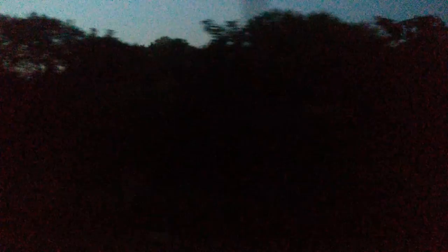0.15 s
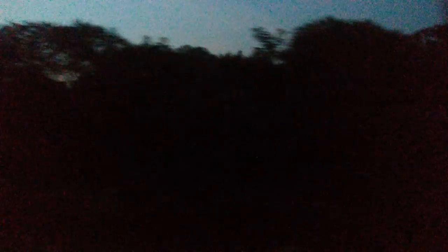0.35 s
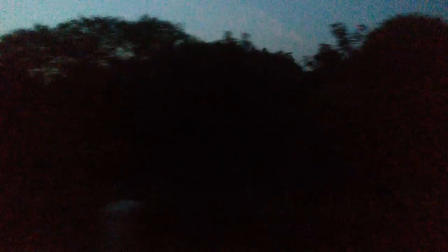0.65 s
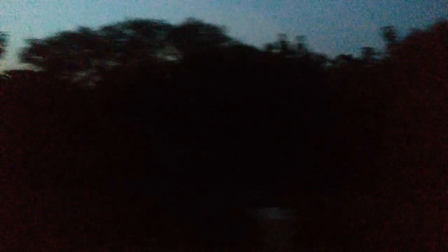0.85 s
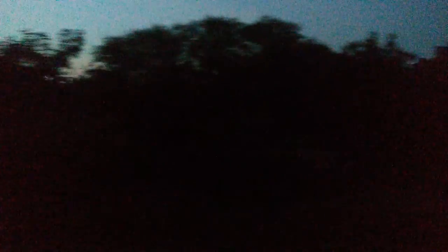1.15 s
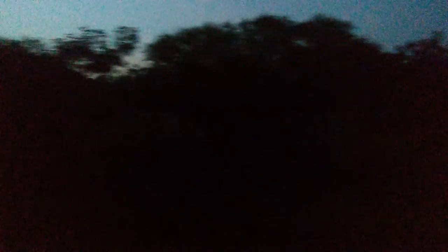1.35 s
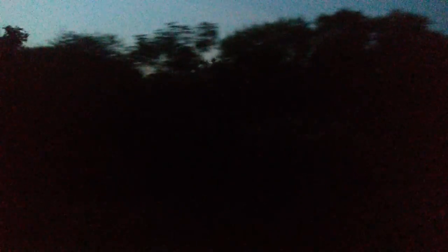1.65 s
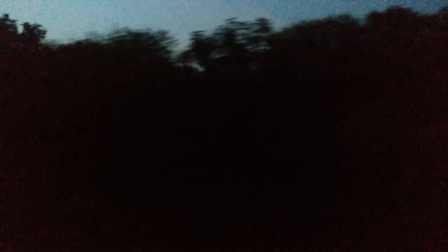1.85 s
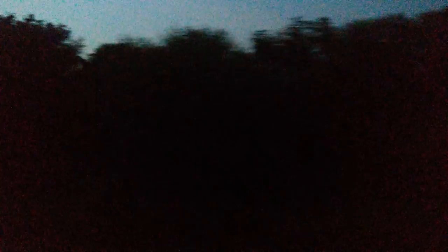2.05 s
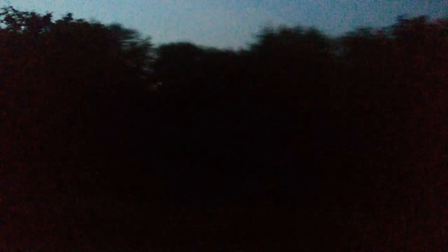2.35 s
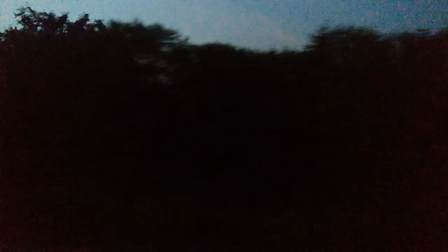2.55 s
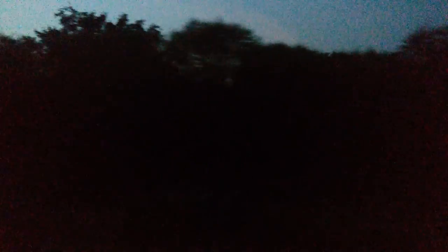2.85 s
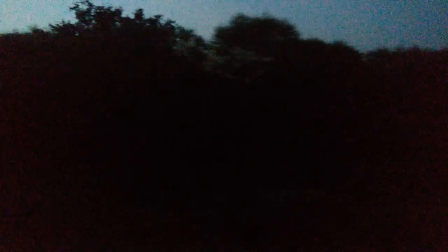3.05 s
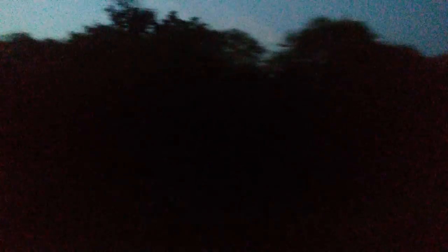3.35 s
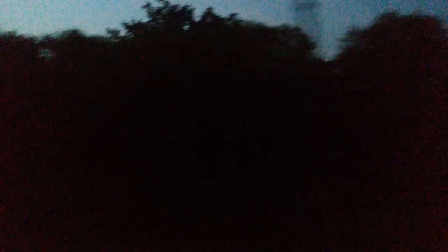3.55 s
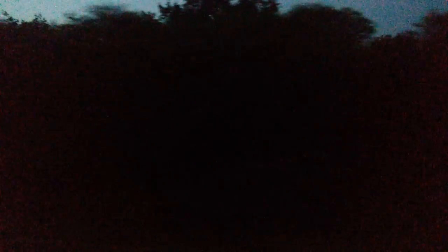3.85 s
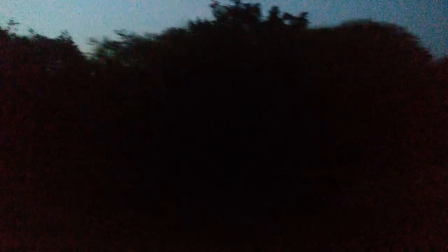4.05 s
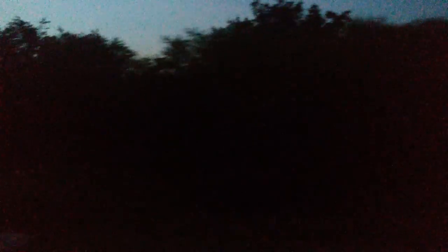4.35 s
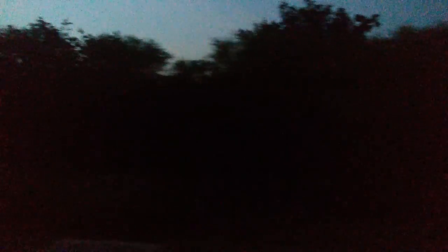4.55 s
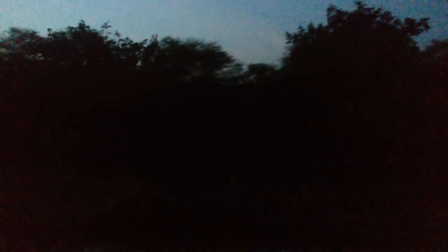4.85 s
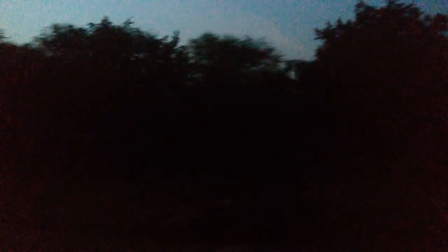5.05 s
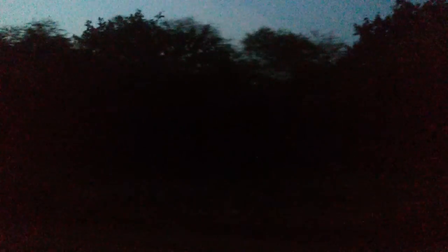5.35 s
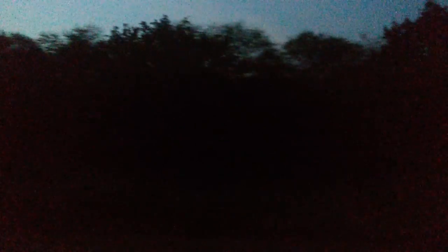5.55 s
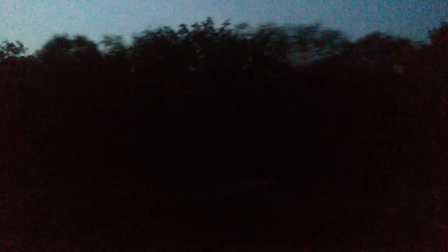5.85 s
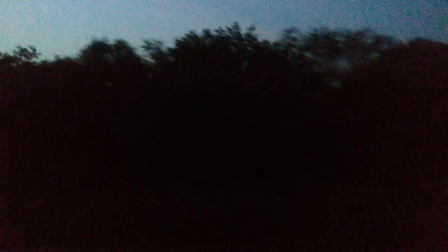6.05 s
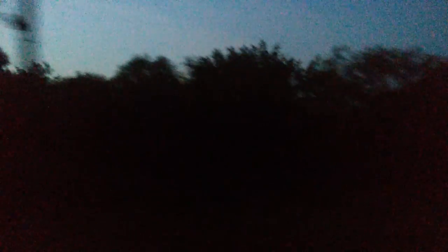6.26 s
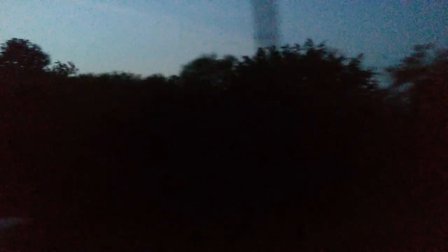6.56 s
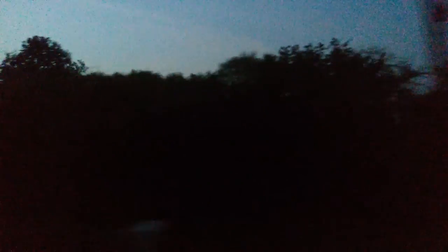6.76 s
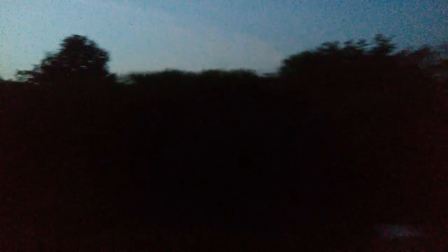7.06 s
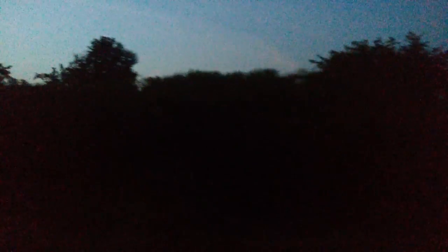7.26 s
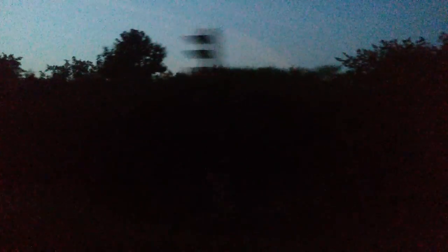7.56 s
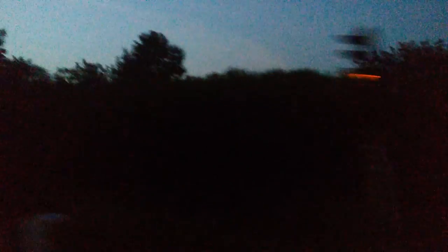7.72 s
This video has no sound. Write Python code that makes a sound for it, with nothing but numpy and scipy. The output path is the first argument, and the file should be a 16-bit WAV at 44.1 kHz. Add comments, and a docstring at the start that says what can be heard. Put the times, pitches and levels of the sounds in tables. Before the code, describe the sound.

A train rolls fast on rough rail, heard from inside the carriage for about eight seconds. A loud low boom and a hollow panel drone run throughout, surging unevenly, with a steady roar and hiss from the wheels and a faint, high rail whine. One wheel knocks lightly about six times a second. Harder jolts with metal clatter and rattle come irregularly, notably around 1, 1.8 to 2, 3.2, 4 and 5.5 seconds. Short hollow knocks sound in the wall near 0.6, 1.5, 1.8, 4.5 and 6.2 seconds. A small metal part pings once, softly, at about 2.6 seconds. Faint, brief wheel squeals come near 0.8, 3 to 3.5 and 5.5 seconds. From about 7.4 seconds to the end there is a cluster of sharper clacks and rattles. The running noise never lets up, and the loudest peaks crackle slightly.

```python
"""Train wheels rolling fast on rough rail, heard from inside the carriage.
They shake the floor into a boom and the panels into a drone, and roar and hiss outside the window.
A flat spot on one wheel knocks once a turn, the running gear jolts, and the wall gives hollow knocks.
The rail sings, wheels squeal briefly and a small metal part pings once.
The loudest peaks are rounded off and clipped, with a slight crackle."""
import sys
import numpy as np
from scipy import signal
from scipy.fft import rfft, irfft, next_fast_len
from scipy.io import wavfile
from scipy.ndimage import uniform_filter1d, map_coordinates

SR = 44100
rng = np.random.default_rng(int(sys.argv[2]) if len(sys.argv) > 2 else 0)


def file_out(sig):
    """Save sig as 16-bit WAV at sys.argv[1]."""
    # one column per channel
    cols = np.atleast_2d(sig).T
    # limit, then scale
    lim = np.clip(cols, -1, 1)
    pcm = np.round(lim * 32767).astype(np.int16)
    wavfile.write(sys.argv[1], SR, pcm)


N = 347949

# Loudness of the carriage body: time_s, boom_db, drone_db
BODY_LEVELS = [(0, -13, -13.5), (.35, -17, -15), (.7, -11, -17.5), (.95, -18.5, -15.5), (1.15, -11.5, -16),
               (1.47, -15.5, -12), (1.7, -12.5, -18), (2, -15, -14), (2.4, -15, -16.5), (2.75, -17.5, -16),
               (2.9, -15.5, -12.5), (3.2, -17, -19), (3.3, -17, -15.5), (3.6, -13.5, -14.5),
               (3.75, -16.5, -15), (4, -17, -14), (4.25, -13, -17.5), (4.42, -12.5, -16.5),
               (4.75, -16.5, -17), (5, -16, -17), (5.3, -16, -18.5), (5.52, -15.5, -18),
               (5.85, -14.5, -20.5), (6.1, -15, -18.5), (6.4, -15, -18.5), (6.7, -12.5, -19), (7, -16, -16),
               (7.12, -16, -15), (7.35, -14.5, -22.5), (7.55, -14.5, -16.5), (7.7, -17, -15),
               (7.89, -12.5, -19)]
# Brief swells and dips in the boom and the drone: middle_s, boom_change_db, drone_change_db
BODY_SWELLS = [(0.571, 2.5, 7), (.82, 1.5, -1), (1.01, -3, 7), (1.36, -2, 3.5), (1.84, -12, 6.5),
               (2.05, 5, -1), (2.61, -1, 6), (3.33, -3.5, 3.5), (4.3, -0.5, 1.5), (4.481, -1.5, 4),
               (4.6, 1.5, 3), (4.77, 1.5, 4), (4.97, 3, -6.5), (5.19, 2, 2), (5.451, 1, 3.5),
               (5.76, 6.5, 2.5), (6.19, -2.5, 2.5), (6.27, 5.5, 0), (6.58, 5, 8), (6.921, 4.5, 4.5),
               (7.16, 7.5, -2), (7.555, 4, -3.5)]
# Tone colour of each rolling noise: pitch_hz, level_db
FLOOR_COLOUR = [(90, -52), (120, -11), (140, -2), (165, 2), (190, 1.5), (230, -2.5), (274, -2), (345, -8),
                (420, -70.5)]
PANEL_COLOUR = [(210, -5), (350, -11.5), (366, 2), (383, 6), (430, 1), (470, 4), (518, -4.5), (567, -0.5),
                (720, -13.5), (940, -22), (1580, -120)]
ROAR_COLOUR = [(400, -18), (680, -1.5), (751, -5.5), (1030, -6.5), (1260, -11.5), (1550, -19.5),
               (2020, -60), (3410, -120)]
HISS_COLOUR = [(850, -28), (1450, -5), (1730, -1.5), (1900, 1.5), (2160, -0.5), (2840, -2.5), (3500, 1),
               (3950, 2.5), (4500, -1), (6070, -7.5), (7120, -14), (8350, -18), (9050, -23), (9600, -33),
               (10000, -100)]
RUMBLE_COLOUR = [(15, -42.5), (25, -36.5), (42, -37.5), (55, -15.5), (72, -16), (97, -6), (115, -6),
                 (150, -26.5), (250, -120)]
# Notes at which each part likes to ring: pitch_hz, width_hz, level_db
FLOOR_NOTES = [(166.7, 20, -9), (272.2, 11.5, -16)]
PANEL_NOTES = [(383.7, 21, -7), (442.6, 47, -11.5)]
SMALL_PANEL_NOTES = [(555, 30, -17), (681, 40, -19)]
WHEEL_RAIL_NOTES = [(2454, 10, -19.5), (4060, 230, -14.5)]
# How freely the floor and the panels ring: time_s, gain_db
FLOOR_RINGING = [(0, -6), (.35, -11), (.8, 6.5), (1.4, -2.5), (2, 2.5), (2.6, -1), (3.6, 4), (4.6, -5.5),
                 (4.85, 9), (5.1, 7.5), (5.5, 5), (5.9, 7), (6.4, -1), (6.9, -3), (7.89, -2.5)]
PANEL_RINGING = [(0, -1), (1.5, -1), (3, -2.5), (3.4, 3.5), (4, 3), (4.7, 0), (5.1, -4.5), (6, 4.5),
                 (6.25, 4.5), (6.6, -4.5), (7.1, 2.5), (7.89, -3)]
# Loudness of the other rolling noises: time_s, rumble_db, roar_db, hiss_db
ROLLING_LEVELS = [(0, -29, -21, -21.5), (.6, -32.5, -21, -20.5), (1.6, -33.5, -21, -22),
                  (2.3, -32, -22.5, -21.5), (2.75, -32, -23.5, -22), (2.95, -32, -24, -21),
                  (3.2, -30, -21, -21), (3.8, -32, -22.5, -22), (5.2, -26.5, -22.5, -21),
                  (5.7, -31.5, -25, -20.5), (6.4, -30.5, -21, -20), (7, -30, -22, -21),
                  (7.1, -36.5, -22, -21.5), (7.3, -30, -19.5, -18), (7.6, -31.5, -22.5, -21.5),
                  (7.89, -33, -24, -22)]

# Harder blows in the running gear: start_s, knock_db, clatter_db, rattle_db, tick_db
JOLTS = [(.2, -25, -34, -29, -36), (.55, -19.5, -27.5, -32.5, -41), (.817, -20.5, -28.5, -26.5, -30),
         (1.023, -17, -24.5, -27, -33), (1.181, -17.5, -31.5, -25, -32), (1.813, -33.5, -22, -18, -29),
         (1.84, -33.5, -23, -21, -34.5), (1.986, -30, -22.5, -23, -33.5), (2.015, -26, -30, -25.5, -30.5),
         (2.312, -22, -28, -30, -31), (2.576, -37, -37, -32, -26.5), (2.641, -18.5, -36, -33, -39),
         (2.948, -16.5, -30, -27, -34.5), (3.06, -19, -38, -39, -51), (3.231, -24, -22.5, -20.5, -23.5),
         (3.259, -14.5, -20, -22.5, -36.5), (3.43, -26, -25, -34, -44), (3.894, -22, -32, -29, -26),
         (4.053, -17, -24, -28.5, -28.5), (4.25, -25.5, -23, -28, -27), (4.366, -22.5, -26, -27, -31),
         (4.69, -23.5, -23.5, -26.5, -33), (4.997, -20.5, -25.5, -32, -44), (5.044, -28, -26, -23, -34.5),
         (5.158, -21.5, -31, -23, -27.5), (5.459, -18.5, -24, -21, -32.5), (5.534, -24, -25, -26, -29),
         (5.618, -17.5, -23.5, -28, -27.5), (5.775, -20, -38, -38, -45), (5.94, -17.5, -36, -32, -43),
         (6.258, -37, -31, -26.5, -25.5), (6.31, -37, -35, -30, -31.5), (6.557, -22, -24, -24, -34),
         (6.871, -20.5, -23.5, -25.5, -30.5), (6.962, -26, -26, -20.5, -23), (7.027, -20.5, -26, -35, -40),
         (7.375, -18, -21, -18, -25), (7.493, -16, -21.5, -20.5, -24.5), (7.635, -27.5, -17.5, -15.5, -22),
         (7.718, -25, -23.5, -20, -23.5), (7.798, -32, -18, -15, -24)]
# Tone colour of each part of a blow: pitch_hz, level_db
KNOCK_COLOUR = [(300, -51), (550, 3.5), (800, -4), (1200, -8), (1600, -20), (2500, -43)]
CLATTER_COLOUR = [(900, -50), (1400, -8.5), (2060, -4.5), (2800, -9), (3500, -8), (4500, -57)]
RATTLE_COLOUR = [(2300, -45), (3100, -9), (3900, -0.5), (4600, -2), (5400, -11.5), (6300, -33.5)]
TICK_COLOUR = [(3800, -28.5), (4800, -2.5), (6000, 0.5), (7000, -10), (8700, -11), (9400, -20),
               (10000, -100)]
# Notes of the frame that holds the wheels: pitch_hz, level_db, fade_s (time to fall 60 dB)
FRAME_NOTES = [(676, 1, 0.092), (820, -2, 0.096), (910, -1, 0.16), (1042, -2, .1), (1490, -11, .07),
               (1880, -12.5, .07)]
# Hollow knocks in the wall: start_s, pitch_hz, level_db
WALL_KNOCKS = [(.555, 417, -4), (1.512, 406, -6.5), (1.835, 396, -5.5), (3.262, 955, -15), (3.32, 385, -8),
               (4.052, 690, -8.5), (4.468, 411, -4), (5.454, 450, -9), (5.94, 917, -14), (6.18, 415, -2.5),
               (6.262, 401, -4), (7.495, 875, -11.5), (7.503, 440, -10.5)]
# Squeals of wheel on rail: middle_s, length_s, pitch_hz, width_hz, level_db
SQUEALS = [(0.822, 0.09, 1915, 90, -29.5), (3.05, 0.3, 2453, 30, -34), (3.47, 0.19, 2465, 22, -32),
           (5.47, 0.08, 4170, 90, -21), (5.631, 0.1, 4090, 120, -22)]
# The strike on the small metal part: start_s, level_db
PING_STRIKES = [(2.576, -22.5)]
# Notes of that part: pitch_hz, level_db, fade_s
PING_NOTES = [(4200, -1, 0.088), (5130, 0.5, .09), (6000, 2, 0.17), (7040, -5.5, 0.088)]
# Loudness of the singing rail: time_s, level_db
WHINE_LEVELS = [(0, -42), (.7, -35), (1.05, -34.5), (1.3, -44.5), (2, -32.5), (2.5, -34.5), (2.9, -31),
                (3.3, -36), (3.6, -42.5), (4.3, -34), (4.7, -50), (5.3, -37.5), (5.65, -32), (6.1, -34),
                (6.7, -42.5), (7.1, -41), (7.89, -39)]


def carriage_body():
    """Rough rail shakes the floor into a boom and the panels into a drone; both surge at random."""
    boom_db, drone_db = curves(BODY_LEVELS) + body_swells()
    boom = steady(noise(FLOOR_COLOUR, patchy_db=0.5))
    boom += amp(*curves(FLOOR_RINGING)) * ringing(FLOOR_NOTES, waver_db=1.4)
    drone = steady(noise(PANEL_COLOUR, patchy_db=0.5))
    drone += amp(*curves(PANEL_RINGING)) * ringing(PANEL_NOTES, waver_db=1.8)
    drone += ringing(SMALL_PANEL_NOTES, waver_db=1.5)
    return amp(boom_db + 0.83 * wobble(9)) * boom + amp(drone_db + wobble(9)) * drone


def body_swells(length_s=0.056):
    """Brief swells and dips in the boom and the drone: two curves in dB."""
    t = np.arange(N) / SR
    return sum(np.outer(change_db, swell(t - s, length_s)) for s, *change_db in BODY_SWELLS)


def wheels_on_rail():
    """Rolling makes a deep rumble, plus a roar and a hiss that waver together with the rough rail."""
    rumble_db, roar_db, hiss_db = curves(ROLLING_LEVELS)
    roughness = wobble(8.7)
    rumble = amp(rumble_db) * noise(RUMBLE_COLOUR, patchy_db=1.5)
    roar = amp(roar_db + 0.19 * roughness) * noise(ROAR_COLOUR, patchy_db=0)
    hiss = noise(HISS_COLOUR, patchy_db=1.13) + ringing(WHEEL_RAIL_NOTES, waver_db=0)
    hiss *= amp(hiss_db + 0.21 * roughness + 0.13 * wobble(18))
    return rumble + roar + hiss


def gear_blows():
    """Each blow is a dull knock, a clank, a clatter of loose steel, a crisp rattle and a bright tick."""
    times, knock_db, clatter_db, rattle_db, tick_db = np.vstack([flat_spot(), JOLTS]).T
    knock = bursts(times, knock_db, rise_s=0.0044, fade_s=0.37) * noise(KNOCK_COLOUR, 1.9)
    clatter = bursts(times, clatter_db, rise_s=0.0071, fade_s=0.28) * noise(CLATTER_COLOUR, 1.2)
    rattle = bursts(times, rattle_db, rise_s=0.0023, fade_s=0.32) * noise(RATTLE_COLOUR, 0.3)
    tick = bursts(times, tick_db, rise_s=0.0055, fade_s=0.34) * noise(TICK_COLOUR, 2.5)
    return knock + frame_clank(times, knock_db) + clatter + rattle + tick


def flat_spot(first_s=0.07, turn_s=0.16093, shrink_s=1.33e-4, jitter_s=0.004, scatter_db=3.5):
    """A flat spot strikes the rail once a wheel turn, a little unevenly; gives rows like JOLTS."""
    turn = np.arange(64)
    times = first_s + turn_s * turn - shrink_s * turn ** 2 / 2  # turns shorten as the train gains speed
    times += jitter_s * rng.standard_normal(len(turn))
    levels_db = [-23, -29, -34, -42] + scatter_db * rng.standard_normal((len(turn), 4))
    return np.column_stack([times, levels_db])[(times > 0) & (times < (N - 1) / SR)]


def frame_clank(times, levels_db):
    """Every blow rings the notes of the wheel frame, in a slightly different mix each time."""
    out, t = np.zeros(N + SR), np.arange(SR // 5) / SR
    hz, note_db, fade_s = np.transpose(FRAME_NOTES)[:, :, None]
    for s, db in zip(times, levels_db):
        spread, phase = rng.standard_normal((2, len(hz), 1))
        notes = amp(note_db + 1.5 * spread) * np.sin(2 * np.pi * (hz * t + phase))
        out[round(s * SR):][:len(t)] += amp(db - 1) * (notes * struck(t, 0.0027, fade_s)).sum(axis=0)
    return out[:N]


def wall_knocks():
    """A knock sets the carriage wall ringing briefly on one note."""
    out, t = np.zeros(N + SR), np.arange(SR // 5) / SR
    shape = struck(t, rise_s=0.0036, fade_s=0.081)
    for s, hz, db in WALL_KNOCKS:
        note = np.sin(2 * np.pi * (hz * t + rng.random()))
        out[round(s * SR):][:len(t)] += amp(db) * shape / shape.max() * note
    return out[:N]


def wheel_squeals():
    """Rubbing on the rail makes a wheel ring for a moment."""
    t = np.arange(N) / SR
    return sum(amp(db) * swell(t - s, length_s) * steady(noisy_note(hz, width_hz))
               for s, length_s, hz, width_hz, db in SQUEALS)


def metal_ping():
    """A small loose metal part is struck and rings briefly, chattering on its seat."""
    out, t = np.zeros(N), np.arange(SR // 4) / SR
    for s, db in PING_STRIKES:
        chatter = 1 + 0.82 * unit(uniform_filter1d(rng.standard_normal(len(t)), size=120))
        ring = sum(amp(note_db) * struck(t, 0.0035, fade_s) * np.sin(2 * np.pi * hz * t)
                   for hz, note_db, fade_s in PING_NOTES)
        out[round(s * SR):][:len(t)] += amp(db) * ring * chatter
    return out


def rail_whine():
    """The rail sings faintly on one note, more or less freely along the track."""
    return amp(*curves(WHINE_LEVELS)) * noisy_note(hz=1898, width_hz=80)


def ringing(notes, waver_db):
    """Notes kept ringing by the rolling; waver_db lets each swell and fade on its own."""
    return sum(amp(db + waver_db * wobble(2.9)) * steady(noisy_note(hz, width_hz))
               for hz, width_hz, db in notes)


def noisy_note(hz, width_hz):
    """Noise narrowed twice around one pitch, so it sounds like a breathy note."""
    b, a = signal.iirpeak(hz, hz / width_hz, SR)
    return unit(signal.lfilter(b, a, signal.lfilter(b, a, rng.standard_normal(N))))


def noise(colour, patchy_db):
    """Noise in a given tone colour, with random louder and softer patches in pitch and time."""
    grid = signal.stft(rng.standard_normal(N), nperseg=512)[2]
    patches = uniform_filter1d(rng.standard_normal(grid.shape), size=6, axis=0)
    patches = unit(uniform_filter1d(patches, size=10, axis=1))
    white = signal.istft(grid * amp(patchy_db * patches), nperseg=512)[1][:N]
    pitch_hz, db = np.transpose(colour)
    return unit(filtered(white, lambda hz: amp(
        np.interp(np.log(hz + 1), np.log(pitch_hz), db, left=-120, right=-120))))


def bursts(times, levels_db, rise_s, fade_s):
    """Loudness curve of a series of blows; where they overlap, their powers add."""
    shape = struck(np.arange(SR // 2) / SR, rise_s, fade_s)
    power = np.bincount(np.round(times * SR).astype(int), amp(2 * levels_db), N)
    return np.sqrt(np.abs(signal.fftconvolve(power, (shape / shape.max()) ** 2)[:N]))


def struck(t, rise_s, fade_s):
    """A quick rise, then a fall of 60 dB every fade_s."""
    return (1 - np.exp(-t / rise_s)) * amp(-60 * t / fade_s)


def swell(t, length_s):
    """A smooth hump centred on t = 0."""
    return np.exp(-(2 * t / length_s) ** 2)


def steady(x, window_s=0.09, strength=0.8):
    """Partly evens out swells slower than window_s."""
    power = np.abs(uniform_filter1d(x ** 2, size=round(window_s * SR))) + 1e-6
    return unit(x / power ** (strength / 2))


def wobble(per_s):
    """A smooth curve through per_s random values a second."""
    return map_coordinates(rng.standard_normal(400), [np.arange(N) * per_s / SR])


def curves(rows):
    """One value per sample for each column after the time."""
    times, *columns = np.transpose(rows)
    return [np.interp(np.arange(N) / SR, times, column) for column in columns]


def filtered(x, gain_at):
    """Turns each frequency up or down by gain_at(hz)."""
    size = next_fast_len(N + 8192)
    return irfft(rfft(x, size) * gain_at(np.fft.rfftfreq(size, 1 / SR)), size)[..., :N]


def amp(db):
    """Turns decibels into a multiplier."""
    return 10 ** (np.asarray(db) / 20)


def unit(x):
    """Scales to an average power of 1."""
    return x / np.sqrt(np.mean(x ** 2) + 1e-20)


def scene():
    """All sources added into one channel."""
    rolling = carriage_body() + wheels_on_rail()
    return (rolling + gear_blows() + wall_knocks() + wheel_squeals() + metal_ping() + rail_whine())[None]


def record(dry, top_hz=13500):
    """The loudest peaks are rounded off and clipped; everything above top_hz is removed."""
    rounded = dry / (1 + np.abs(dry / 0.99) ** 4) ** 0.11
    return filtered(np.clip(rounded, -1, 1), lambda hz: hz < top_hz)


dry = scene()
out = record(dry)
file_out(out)
```